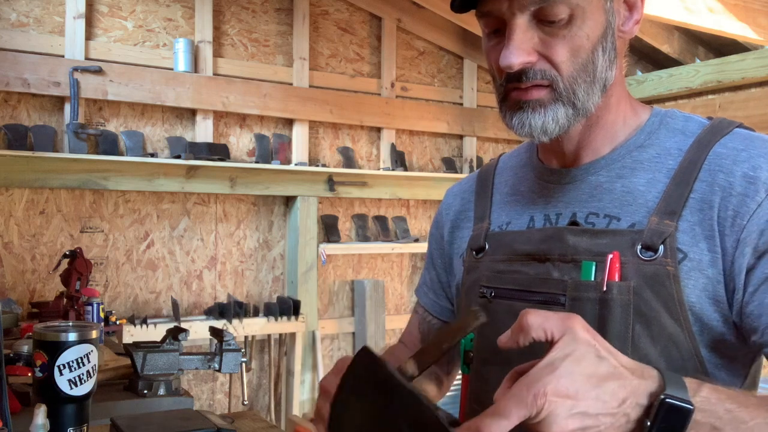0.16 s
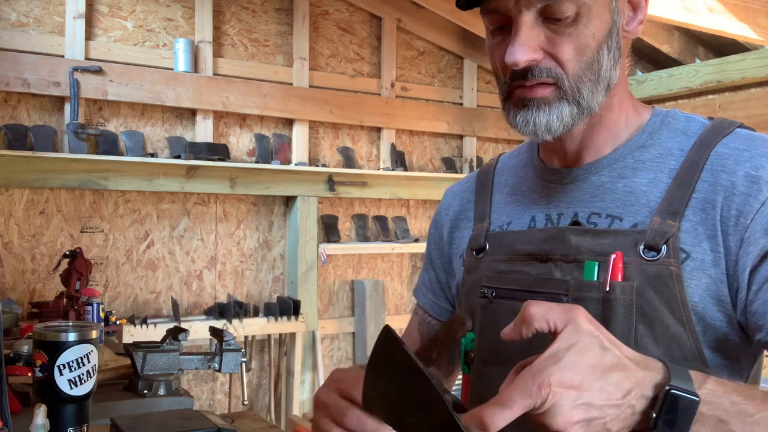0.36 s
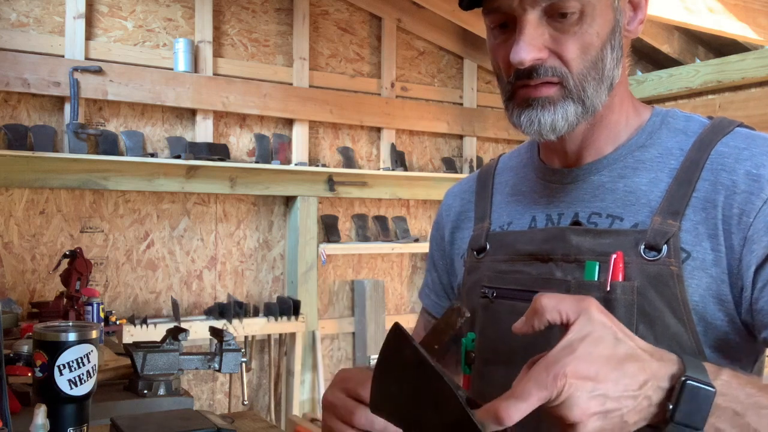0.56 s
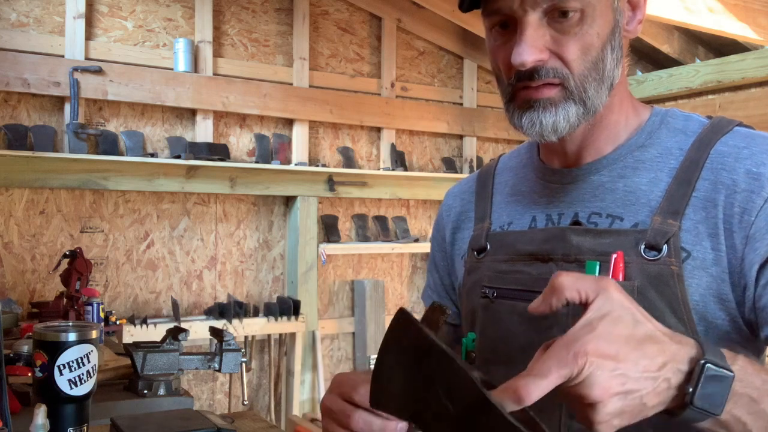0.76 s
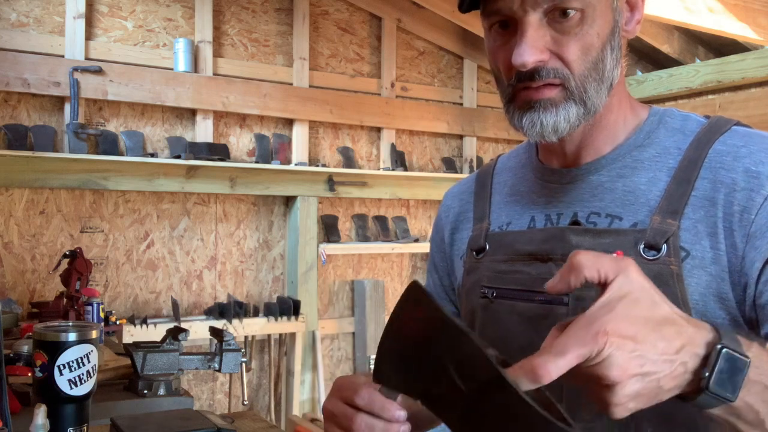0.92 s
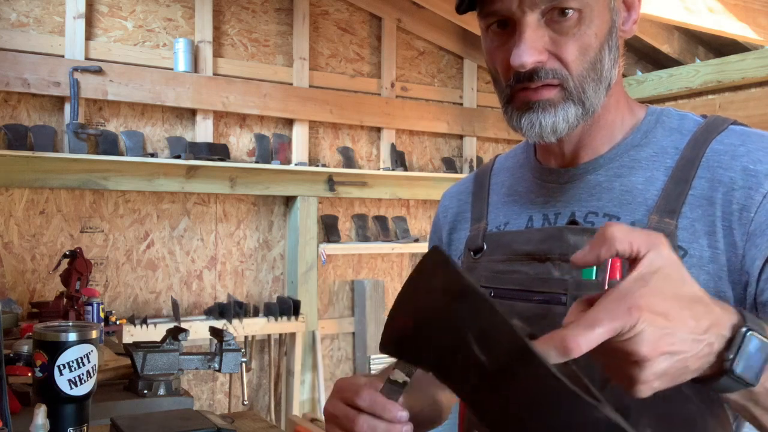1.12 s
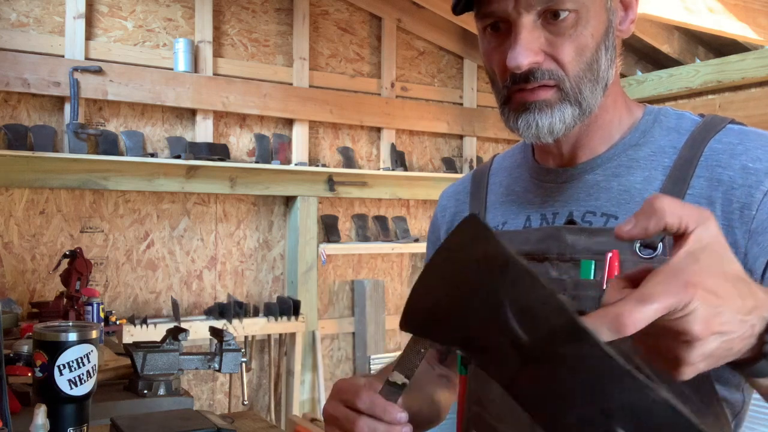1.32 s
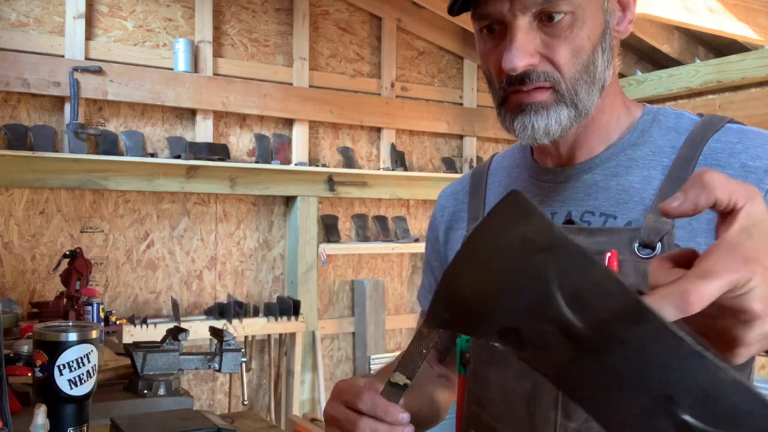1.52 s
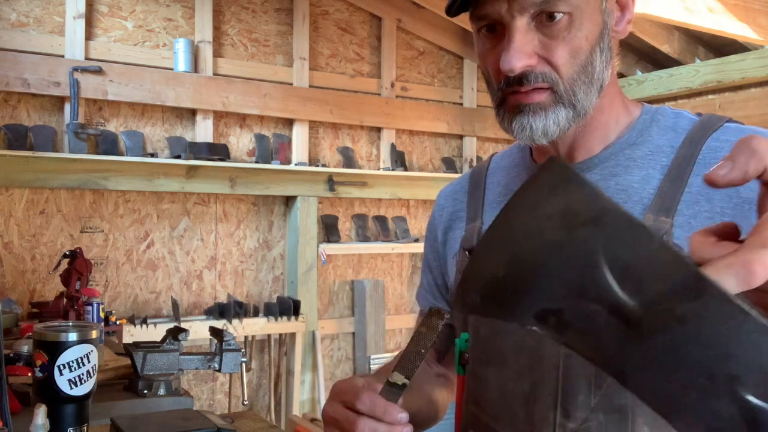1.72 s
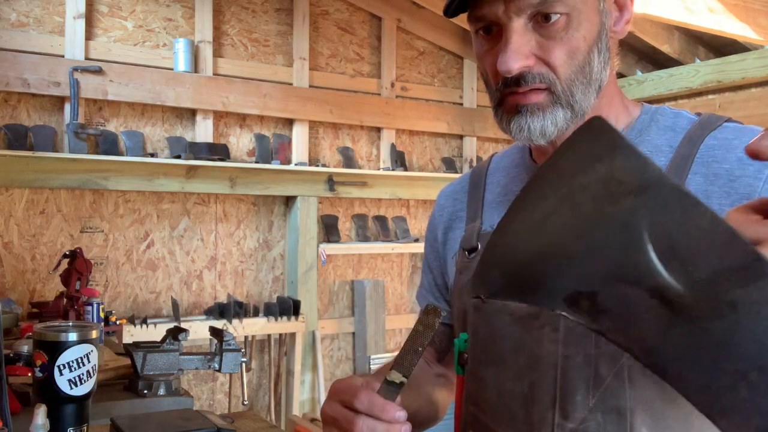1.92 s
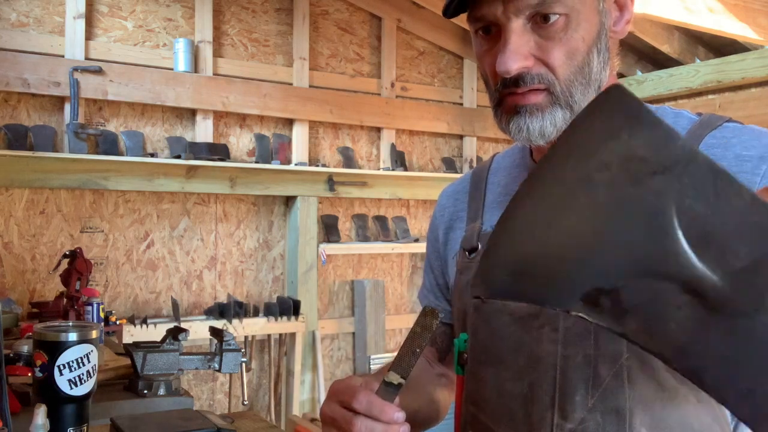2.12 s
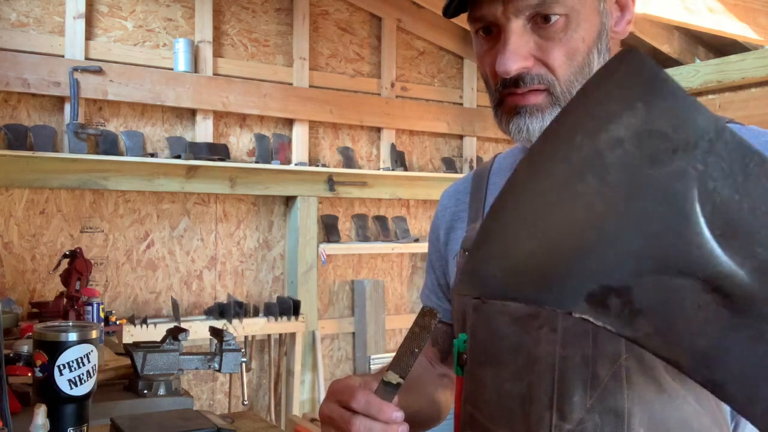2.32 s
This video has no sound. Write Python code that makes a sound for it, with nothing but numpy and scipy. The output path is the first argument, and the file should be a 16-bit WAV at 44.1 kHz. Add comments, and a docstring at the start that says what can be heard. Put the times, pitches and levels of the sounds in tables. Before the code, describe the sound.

A steel axe head is struck once with a file at about 0.2 seconds, giving a close, sharp clink with a brief workshop echo. The bright overtones die within half a second. One clear high tone sings on, swelling around 0.7 seconds, then wavering between left and right as it fades, barely there after 2 seconds. A very soft grip rustle comes near 2.1 seconds, over faint rumble and hum.

```python
"""A bare steel axe head is held in a wooden workshop, over low rumble, faint hiss and mains hum.
A steel file skims it and lands once with a crack and a clink; the gain ducks and the walls answer.
The head's high modes die quickly, while one clear tone sings on, swelling and fading in each ear
as the head is turned and brought closer. Near the end, the grip rustles softly."""
import sys
import numpy as np
from scipy import signal
from scipy.fft import rfft, irfft
from scipy.io import wavfile
from scipy.ndimage import uniform_filter1d, minimum_filter1d

SR = 44100
rng = np.random.default_rng(int(sys.argv[2]) if len(sys.argv) > 2 else 0)


def dump(signal):
    """Clip the signal to [-1, 1] and save it as 16-bit WAV at the path in sys.argv[1]."""
    limited = np.clip(np.atleast_2d(signal).T, -1, 1)
    pcm = np.round(limited * 32767).astype(np.int16)
    wavfile.write(sys.argv[1], SR, pcm)


N = 110250
T = np.arange(N) / SR
STRIKE_S = .2172


def from_db(db):
    """Decibels to gain."""
    return 10 ** (np.asarray(db) / 20)


def unit_rms(x):
    """Scale to an rms of 1."""
    return x / np.sqrt(np.mean(x ** 2) + 1e-20)


def automation(points):
    """Join (time, value) points into a curve, sample by sample."""
    return np.interp(T, *np.transpose(points))


def at_hz(points, hz):
    """Read a table on a log-frequency axis."""
    freqs, values = np.transpose(points)
    return np.interp(np.log(hz + 1e-9), np.log(freqs), values)


def spread(amount):
    """Split an offset between the ears: half up on the left, half down on the right."""
    return amount * np.array([[.5], [-.5]])


def noise(spectrum):
    """Coloured stereo noise of unit rms, widest in the mids."""
    # how alike the ears are: (frequency [Hz], correlation [0-1])
    likeness = [(60, .9), (150, 0.68), (300, 0.44), (700, .3), (2000, 0.17), (8000, .3), (12000, 1)]
    hz = np.arange(N // 2 + 1) * SR / N
    mid, side = rfft(rng.standard_normal((2, N))) * from_db(at_hz(spectrum, hz))
    alike = np.clip(at_hz(likeness, hz), -1, 1)
    ears = np.sqrt(1 + alike) * mid + np.sqrt(1 - alike) * side * [[1], [-1]]
    return unit_rms(irfft(ears, N))


def decay(t60, start=0):
    """Envelope that jumps to 1 and falls by 60 dB in t60 seconds."""
    return (T >= start) * np.exp(-np.log(1000) * np.maximum(T - start, 0) / t60)


def ring(hz, t60, lead_rad, rise_s=.0008):
    """One mode builds up during the first contact and rings out, the left ear leading in phase."""
    age = T - STRIKE_S
    phase = rng.uniform(0, 2 * np.pi) + spread(lead_rad)
    attack = np.clip(age / rise_s, 0, 1)
    return attack * decay(t60, STRIKE_S) * np.sin(2 * np.pi * hz * age + phase)


def room_tone(floor_db=-58.5):
    """A steady bed of low rumble, faint hiss and mains hum."""
    # colour of the rumble and hiss: (frequency [Hz], relative level [dB])
    floor_colour = [(25, -19), (45, -1.5), (65, 0.5), (90, -1.5), (160, -6), (250, -16.5), (400, -22.5),
                    (700, -35), (1500, -40), (3000, -50.5), (5000, -46), (7200, -42), (9000, -59.5),
                    (12000, -46.5), (16000, -62)]
    # mains harmonics: (frequency [Hz], level [dB])
    harmonics = [(120, -59.5), (240, -72.5)]
    hum = sum(from_db(db) * np.sin(2 * np.pi * (hz * T + rng.random())) for hz, db in harmonics)
    return from_db(floor_db) * noise(floor_colour) + np.sqrt(2) * hum


def singing_tone(hz=2144.0, waver_db=.53, waver_cutoff_hz=37.8):
    """The long mode, faintly alive from an earlier blow, swells and fades as the struck head turns."""
    # the tone at the left ear: (time [s], level [dB])
    left = [(0, -63), (.21, -75), (.22, -43.5), (.33, -37.5), (.5, -32.5), (.72, -28.5), (.98, -33),
            (1.37, -52), (1.47, -44), (1.62, -40.5), (1.8, -47), (2.05, -57.5), (2.19, -64.5), (2.3, -51.5),
            (2.5, -54)]
    # the tone at the right ear: (time [s], level [dB])
    right = [(0, -70), (.21, -88), (.22, -33.5), (.33, -37), (.54, -28), (.74, -25.5), (.94, -30.5),
             (1.04, -39), (1.11, -48), (1.18, -41), (1.28, -38.5), (1.44, -45.5), (1.62, -44.5),
             (1.78, -50), (2.0, -52.5), (2.2, -61.5), (2.38, -57.5), (2.5, -57)]
    # how far the left ear leads: (time [s], phase [rad])
    lead = [(0, 1.3), (.3, 1.07), (.75, 0.74), (1.07, 1.21), (1.14, 0.63), (1.31, .05), (1.41, 0),
            (1.68, 1.03), (1.92, 3.5), (2.14, 3.5), (2.27, -1), (2.5, 0.5)]
    smoothing = signal.butter(2, waver_cutoff_hz, fs=SR, output="sos")
    waver = waver_db * unit_rms(signal.sosfilt(smoothing, rng.standard_normal(N)))
    level = from_db(np.array([automation(left), automation(right)]) + waver)
    return np.sqrt(2) * level * np.sin(2 * np.pi * hz * T + spread(automation(lead)))


def file_blow(skim_s=.025, skim_db=-25):
    """The file skims the steel, then lands with a short clink of its own, damped by the hand."""
    # colour of the skim: (frequency [Hz], relative level [dB])
    skim_colour = [(300, -45.5), (2500, -28), (3600, -22.5), (4600, -7), (6000, -22.5), (7000, -9.5),
                   (7600, -3.5), (8300, -31), (10000, -59.5)]
    # modes of the file: (frequency [Hz])
    pitches = [2900, 4495, 4556, 6900, 7605, 9440, 12600, 14260]
    # how each of them rings: (level [dB], t60 [s])
    modes = [(-25.5, 0.098), (-23.5, .08), (-15, .13), (-10.5, 0.033), (-17.5, .07), (-11.5, .075),
             (-17.5, .045), (-28, .1)]
    swell = np.clip(1 + (T - STRIKE_S) / skim_s, 0, 1) ** 1.7 * (T < STRIKE_S)
    skim = from_db(skim_db) * swell * noise(skim_colour)
    clink = sum(from_db(db) * ring(hz, t60, lead_rad=1.7) for hz, (db, t60) in zip(pitches, modes))
    return skim + clink


def crack(level_db=-14.5, chatter_s=.007, decay_s=.0015):
    """The file's edge chatters on the steel, then leaves it: one bright burst of noise."""
    # colour of the contact: (frequency [Hz], relative level [dB])
    colour = [(40, -12.5), (200, -4), (400, -16), (750, -42), (1200, -14), (2200, -14.5), (3500, -15),
              (4500, 0.5), (7000, 0.5), (8400, -13.5), (9600, 0.5), (13000, 3.5), (15500, -16.5),
              (18000, -35.5)]
    contact = (T >= STRIKE_S) * np.exp(-np.maximum(T - STRIKE_S - chatter_s, 0) / decay_s)
    return from_db(level_db) * contact * noise(colour)


def axe_modes(dip_hz=11476, first_dip_s=.143, beaming_hz=5520, lobe_depth=.8):
    """The head's short-lived modes pulse as turning sweeps their radiation lobes past the listener."""
    # modes of the axe head: (frequency [Hz])
    pitches = [540, 1709, 1891, 3137, 3915, 5498, 6572, 8973, 10595, 11062, 11476, 11690, 11990, 13372,
               13775]
    # how each of them rings: (level [dB], t60 [s], left over right [dB])
    modes = [(-44, .19, 2), (-36.5, 0.86, 0), (-25, 0.64, 2), (-32, .48, 4), (-35.5, .2, -3),
             (-19, .25, -0.5), (-24, .3, -2.5), (-28, 0.14, 1.5), (-33, .21, 0), (-23, 0.32, 1.5),
             (-15, .41, -1), (-42.5, .62, -2), (-31.5, 0.22, -2), (-18, 0.17, 1), (-31.5, 0.2932, -5.5)]
    # the turn gathers speed; a mode at dip_hz dips first_dip_s after the blow, higher ones sooner
    turn = (np.maximum(T - STRIKE_S, 0) / first_dip_s) ** 1.5
    out = 0
    for hz, (db, t60, pan_db) in zip(pitches, modes):
        depth = lobe_depth * min(hz / beaming_hz, 1) ** 3   # low modes radiate more evenly
        lobes = np.abs(1 + depth * np.exp(1j * np.pi * turn * hz / dip_hz))
        out = out + from_db(db + spread(pan_db)) * lobes * ring(hz, t60, lead_rad=1.0)
    return out


def workshop_reverb(send, return_db=-7, t60=.37):
    """Dense reflections from the wooden walls, different at each ear."""
    # colour of the reflections: (frequency [Hz], relative level [dB])
    colour = [(200, -6.5), (1100, 7.5), (2400, -6.5), (3500, -1), (4600, 5.5), (7300, 0.5), (8400, -16.5),
              (9500, -4.5), (12000, -6), (16000, -21.5)]
    impulse = unit_rms(noise(colour) * decay(t60)) / np.sqrt(N)
    return from_db(return_db) * signal.fftconvolve(send, impulse, axes=1)[:, :N]


def grip_rustle():
    """Soft brushes of noise as the grip shifts."""
    # bell-shaped swells, one for each shift: (time [s], half-width [s], level [dB])
    shifts = [(2.03, 0.017, -75), (2.129, 0.031, -64), (2.453, 0.079, -78)]
    # colour of the rustle: (frequency [Hz], relative level [dB])
    colour = [(200, 7.5), (600, -1), (1000, -6.5), (1550, -3), (2200, -10), (2850, -37), (4000, -23),
              (16000, -51)]
    swells = sum(from_db(db) * np.exp(-.5 * ((T - time) / width) ** 2) for time, width, db in shifts)
    return noise(colour) * swells


def scene(axe_send_db=-7, crack_send_db=-4):
    """The blow and the rustle feed the reverb; the singing tone and the room tone stay dry."""
    axe, contact = axe_modes(), crack()
    file_and_grip = file_blow() + grip_rustle()
    send = file_and_grip + from_db(axe_send_db) * axe + from_db(crack_send_db) * contact
    return axe + contact + file_and_grip + workshop_reverb(send) + singing_tone() + room_tone()


def record(dry, threshold_db=-15, ceiling=.78, stopband_hz=16800):
    """Automatic gain ducks on the blow, holds and recovers; peaks are rounded and the top is cut."""
    lookahead_s, attack_s, hold_s, release_db_per_s = .0025, .008, .11, 57
    power = uniform_filter1d(np.mean(dry ** 2, axis=0), size=128)
    over_db = np.maximum(10 * np.log10(np.maximum(power, 1e-12)) - threshold_db, 0)
    half_hold = int(hold_s * SR / 2)
    # the largest overshoot of the last hold_s
    held_db = -minimum_filter1d(-over_db, 2 * half_hold + 1, origin=half_hold, mode="constant")
    release_db = release_db_per_s * T
    duck_db = np.maximum.accumulate(held_db + release_db) - release_db
    duck_db = np.interp(T + lookahead_s, T, duck_db)
    pole = np.exp(-1 / (attack_s * SR))
    gain = from_db(-signal.lfilter([1 - pole], [1, -pole], duck_db))
    rounded = ceiling * np.tanh(dry * gain / ceiling)
    high_cut = signal.cheby2(14, 60, stopband_hz, fs=SR, output="sos")
    return signal.sosfilt(high_cut, rounded)


dry = scene()
out = record(dry)
dump(out)
```